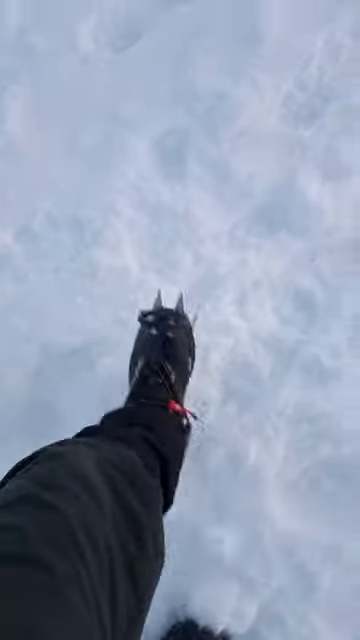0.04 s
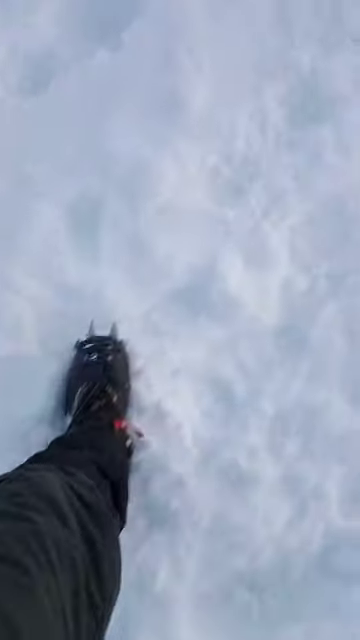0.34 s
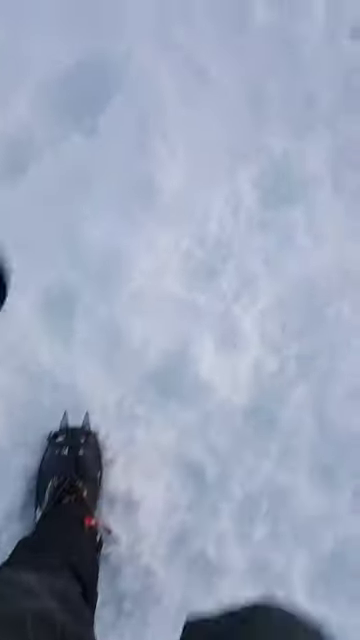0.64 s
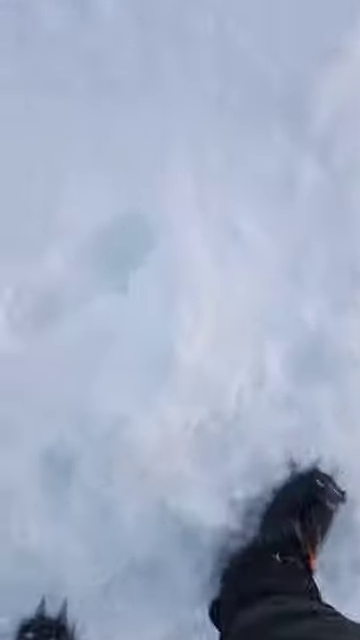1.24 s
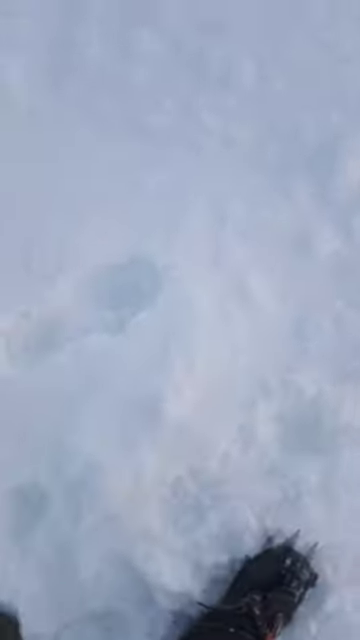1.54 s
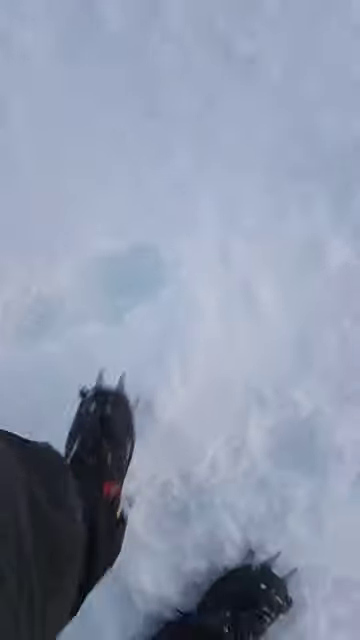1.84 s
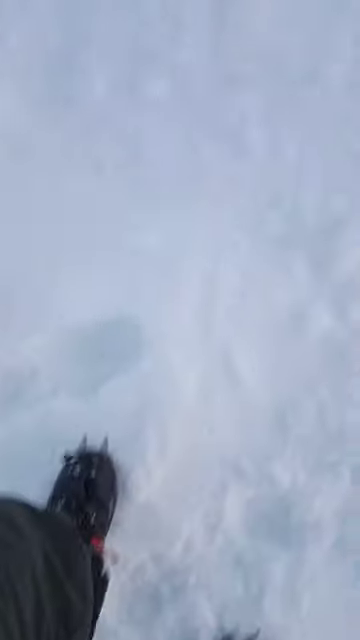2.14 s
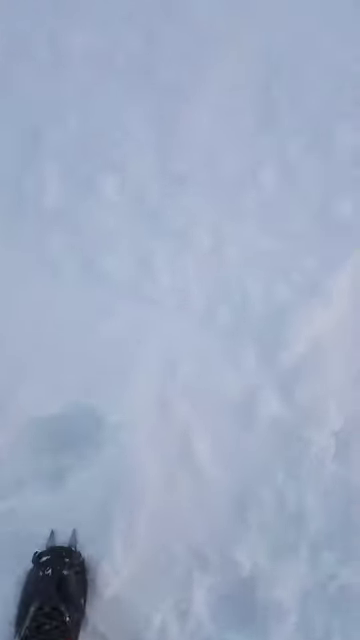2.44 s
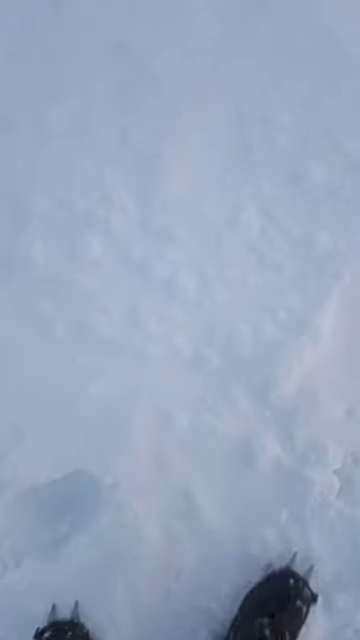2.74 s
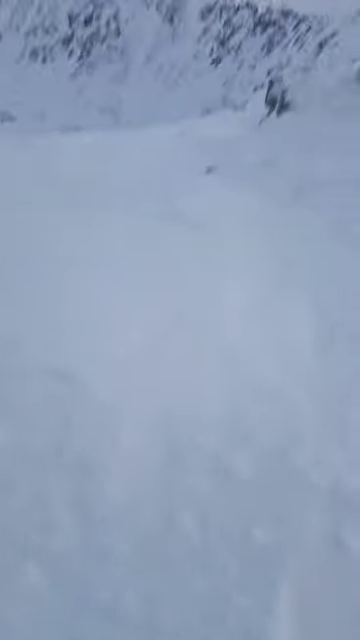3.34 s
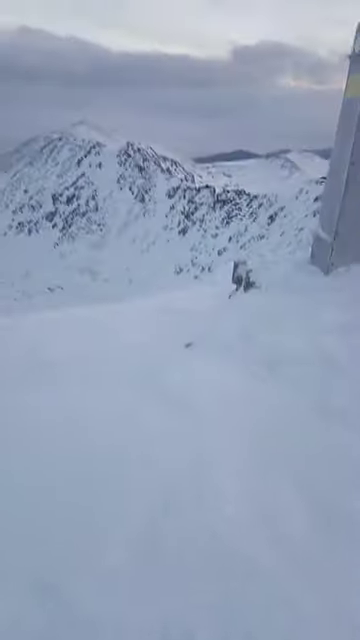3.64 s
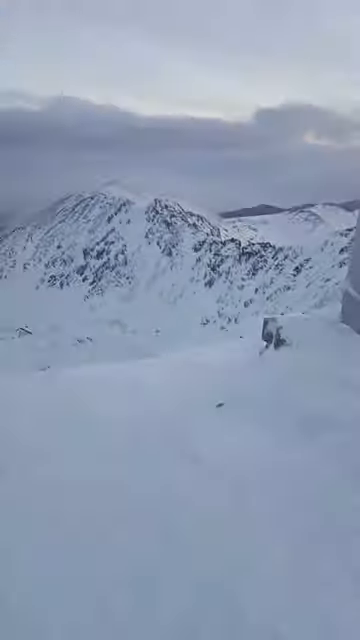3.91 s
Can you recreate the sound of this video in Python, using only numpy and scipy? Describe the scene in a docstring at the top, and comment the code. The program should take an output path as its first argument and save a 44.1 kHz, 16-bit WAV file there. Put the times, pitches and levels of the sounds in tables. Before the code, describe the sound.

Spiked boots crunch over firm, icy snow while low wind rumbles on the microphone.

```python
"""Boots with steel crampons crunch over firm, icy snow, heard from a hand-held phone in the open.
The crust fails by brittle fracture: a rush of tiny impulses, coloured by ice, crust and the hollow-
sounding pack beneath. Impacts excite damped modes of the spikes, the crampon frame and the pack.
Turbulent wind buffets the two microphone ports separately, over a faint hiss;
the right port hears little treble."""
import sys
import numpy as np
from scipy import signal
from scipy.fft import rfft, irfft, next_fast_len
from scipy.io import wavfile

SR = 44100
rng = np.random.default_rng(int(sys.argv[2]) if len(sys.argv) > 2 else 0)


def generate_wav(sig):
    """Save sig (samples, or channels by samples) to the path in sys.argv[1] as 16-bit PCM at SR."""
    pcm = np.round(np.clip(np.atleast_2d(sig).T, -1, 1) * 32767).astype(np.int16)
    wavfile.write(sys.argv[1], SR, pcm)


N = 176400

# response of the right microphone port (f/Hz, gain/dB)
RIGHT_PORT_RESPONSE = [(1000, -0.5), (1800, -6.5), (3000, -4), (4500, -11), (6500, -16), (9500, -36),
                       (12000, -29), (15000, -19)]


def undb(db):
    """Amplitude ratio of a level in decibels."""
    return 10 ** (np.asarray(db) / 20)


def colour(x, points, keep_power=True):
    """Minimum-phase filter through (f/Hz, gain/dB) points; keep_power preserves white-noise power."""
    size = next_fast_len(N + 8192)
    hz, db = np.array(points, float).T
    gain = undb(np.interp(np.log(np.fft.rfftfreq(size, 1 / SR) + 1), np.log(hz), db))
    if keep_power:
        gain = gain / np.sqrt(np.mean(gain ** 2))
    cepstrum = irfft(np.log(gain), size)
    cepstrum[1:size // 2] *= 2  # folding onto positive time makes the filter causal
    cepstrum[size // 2 + 1:] = 0
    return irfft(rfft(x, size) * np.exp(rfft(cepstrum)), size)[..., :N]


def right_port(x):
    """Low-pass response: the right port attenuates the treble."""
    return colour(x, RIGHT_PORT_RESPONSE, keep_power=False)


def wander(hz):
    """Bounded random modulation, interpolated between hz values a second, with a spread near 1."""
    return np.interp(np.arange(N) * hz / SR, np.arange(N), np.sqrt(3) * rng.uniform(-1, 1, N))


def strike(hits, modes, detune=0.032):
    """Free vibration: each blow excites exponentially damped modes, slightly detuned at random."""
    out = np.zeros(N)
    for start, hit_db in hits:
        i = int(start * SR)
        age = np.arange(min(SR // 10, N - i)) / SR
        for (hz, db, t60), chance in zip(modes, rng.standard_normal(len(modes))):
            decay = undb(hit_db + db) * np.exp(-np.log(1000) * age / t60)
            out[i:i + len(age)] += decay * np.sin(2 * np.pi * hz * (1 + detune * chance) * age)
    return out


def air():
    """Broadband flow noise: wind hisses faintly over the open snow."""
    spectrum = [(200, -1), (600, -7.5), (1200, -9), (3000, -11), (6000, -13), (10000, -8.5), (12500, -15),
                (15500, -22.5)]  # hiss (f/Hz, relative level/dB)
    left, right = colour(rng.standard_normal((2, N)), spectrum) * undb(-63 + 0.5 * wander(hz=7.56))
    return np.array([left, right_port(right)])


def wind(t):
    """Turbulent pressure, independent at each port: a lumpy rumble and flurries of smaller eddies."""
    # wind pressure at each port (t/s, level/dB)
    left_gusts = [(0, -25), (.13, -45.5), (.25, -29), (.36, -36), (0.418, -22), (.58, -33), (.72, -36.5),
                  (.92, -19), (1.04, -31), (1.12, -21), (1.2, -30), (1.36, -26.5), (1.5, -39), (1.66, -39),
                  (1.8, -48.5), (1.93, -35.5), (2.1, -43.5), (2.2, -39), (2.42, -44), (2.52, -55.5),
                  (2.662, -33), (2.75, -50), (3.0, -41.5), (3.22, -39.5), (3.32, -55), (3.56, -44),
                  (3.608, -22.5), (3.78, -33), (3.95, -40)]
    right_gusts = [(0, -37.5), (.15, -43.5), (.35, -37.5), (.53, -31), (.75, -39), (1.0, -42),
                   (1.35, -40.5), (1.6, -46.5), (1.75, -42.5), (2.1, -54), (2.35, -50), (2.58, -66.5),
                   (2.9, -39), (3.3, -47), (3.6, -41.5), (3.95, -38)]
    # spectral densities of large and small eddies (f/Hz, relative level/dB)
    rumble_spectrum = [(15, -55), (28, -50.5), (42, -20), (70, 3.5), (110, 4.5), (170, -1.5), (260, -13.5),
                       (400, -23.5), (700, -40), (1500, -68)]
    flurry_spectrum = [(120, -29), (250, 1), (400, -9), (600, -15.5), (1000, -35.5), (2000, -48)]
    ports = []
    for gusts, flurry_db in (left_gusts, -22.5), (right_gusts, -12):
        pressure = undb(np.interp(t, *np.array(gusts).T))
        eddies = wander(hz=54.68)
        rumble = colour(rng.standard_normal(N), rumble_spectrum) * undb(2.5 * eddies)
        flurry = colour(rng.standard_normal(N), flurry_spectrum) * undb(flurry_db + 8 * eddies)
        ports.append(pressure * (rumble + flurry))
    return np.array(ports)


def buffets(t):
    """Convection: an eddy carried across a port makes a brief pressure swing with no net impulse."""
    # single eddies (t/s, f/Hz, level/dB, half length/cycles, port: 0 left, 1 right)
    eddies = [(0.211, 165, -22, 0.52, 0), (0.271, 121, -17.5, 0.49, 0), (0.418, 205, -11.5, 0.71, 0),
              (0.436, 173, -14.5, 0.29, 0), (.502, 115, -14.5, 0.41, 0), (.531, 169, -14.5, 0.3, 0),
              (.651, 155, -22, 0.9, 0), (0.777, 157, -18.5, 0.23, 0), (0.836, 155, -17.5, 0.54, 0),
              (0.888, 116, -11.5, 0.72, 0), (0.898, 150, -17, 0.55, 0), (.948, 180, -19.5, 0.47, 0),
              (.915, 284, -20.5, 0.83, 0), (0.919, 106.8, -17.5, 1, 0), (0.972, 157, -9, 0.28, 0),
              (.977, 310, -15, 0.41, 0), (1.015, 148, -11, 0.52, 0), (1.111, 188, -14, 0.39, 0),
              (1.153, 166, -18.5, 0.39, 0), (1.256, 148, -12, 0.38, 0), (1.269, 240, -17, 0.4, 0),
              (1.651, 133, -23.5, 0.45, 0), (1.94, 111, -23.5, 0.96, 0), (2.054, 180, -28, 0.25, 0),
              (2.661, 156, -25.5, 0.93, 0), (3.601, 221, -6.5, 0.78, 0), (3.627, 158, -10.5, 0.39, 0),
              (3.656, 146, -15, 0.9, 0), (3.763, 141.5, -10.5, 0.43, 0), (3.931, 144, -24.5, 1.5, 0),
              (0.492, 330, -21.5, 0.4, 1), (0.51, 161, -20, 0.34, 1), (.661, 170, -22.5, 0.65, 1),
              (0.715, 201, -28.5, 0.21, 1), (1.264, 206, -24, .6, 1), (1.295, 227, -27.5, 0.42, 1),
              (1.849, 260, -36, 0.16, 1), (2.31, 95, -23, 0.67, 1), (2.767, 295, -28.5, 0.53, 1),
              (3.492, 258, -32.5, 0.4, 1), (2.898, 260, -26, 0.47, 1), (2.904, 108.6, -26, 1, 1),
              (2.974, 225, -22.5, 0.46, 1), (3.14, 261, -31, 0.24, 1), (3.197, 283, -27.5, 0.54, 1),
              (3.406, 417, -32.5, 0.34, 1), (3.452, 246, -29.5, 0.72, 1), (3.761, 332, -27, 0.35, 1),
              (3.775, 300, -28.5, .4, 1), (3.830, 275, -22, 0.47, 1), (3.850, 270, -21.5, 0.38, 1),
              (3.907, 323, -20.5, 0.36, 1), (3.929, 240, -21.5, 0.24, 1)]
    out = np.zeros((2, N))
    for (centre, hz, db, half_length, port), phase in zip(eddies, rng.random(len(eddies))):
        near = abs(t - centre) < 0.05
        cycles = (t[near] - centre) * hz
        swirl = np.sin(2 * np.pi * (cycles + phase)) / np.cosh(np.pi / 2 * cycles / half_length)
        out[int(port), near] += undb(db) * np.gradient(swirl, cycles) / (2 * np.pi)
    return out


def thuds():
    """Impact excitation: the sole drops onto packed snow and drives low, heavily damped modes."""
    landings = [(.123, -35.5), (1.986, -27.5), (1.993, -36), (2.016, -26.5), (2.044, -25.5), (2.052, -27.5),
                (2.106, -43), (2.193, -39), (2.812, -29)]  # blows of the sole (t/s, level/dB)
    pack_modes = [(228, -3, 0.039), (478, -4.5, 0.014), (553, -1, 0.029), (880, -30.5, 0.01)]  # sole on the snow pack (f/Hz, level/dB, T60/s)
    return strike(landings, pack_modes)


def crampons(t, snap_s=0.0017):
    """Fracture and modal ringing: spikes snap the ice and ring, damped by snow; the frame clacks."""
    bites = [(0.0408, -40, -33), (0.1206, -33.5, -28), (0.61, -36.5, -61), (0.741, -44, -45),
             (0.813, -46, -51), (0.823, -42, -39.5), (1.0605, -47, -23.5), (1.10, -36, -42),
             (1.1503, -46, -24), (1.341, -53, -30), (1.433, -37, -31), (1.715, -49, -46), (1.744, -45, -49),
             (1.9858, -52, -19), (1.992, -35, -19), (2.014, -37, -36), (2.024, -42, -22),
             (2.04, -29.5, -35), (2.054, -26.5, -50), (2.1924, -56, -44), (2.274, -37, -40),
             (2.2963, -55, -45), (2.414, -37, -43), (2.454, -30.5, -42), (2.7974, -45, -42),
             (2.8108, -28, -26), (2.861, -32, -29), (2.878, -47, -48), (3.041, -45.5, -59),
             (3.174, -60, -57), (3.193, -50, -50), (3.326, -56, -46), (3.425, -45, -51),
             (3.547, -37.5, -37.5), (3.7742, -39, -48)]  # spikes entering ice (t/s, snap level/dB, ring level/dB)
    clacks = [(.024, -54), (.037, -53), (.103, -45), (.123, -29), (.131, -41.5), (.612, -58), (.826, -51.5),
              (2.799, -33), (2.812, -42.5), (3.548, -49), (3.776, -58.5)]  # frame knocking against the boot (t/s, level/dB)
    snap_spectrum = [(400, -4), (1500, 3.5), (3000, -4.5), (4500, -2), (7000, 5), (10000, 0), (12500, -4),
                     (15500, -18)]  # spectral density of snapping ice (f/Hz, relative level/dB)
    # modes of the steel (f/Hz, level/dB, T60/s)
    spike_modes = [(6120, -20, 0.047), (7500, -29.5, .05), (9300, -8.5, 0.033), (9830, -8, .035)]
    frame_modes = [(1557, -21, 0.021), (1930, -13, 0.035), (2714, -8, 0.03), (2983, -1.5, 0.022),
                   (3310, -12, 0.017), (5080, -8, .03), (6770, -10.5, 0.044)]
    envelope = sum((t >= start) * undb(db) * np.exp(-np.minimum(abs(t - start) / snap_s, 20))
                   for start, db, _ in bites)
    ring = strike([(start, db) for start, _, db in bites], spike_modes)
    snap = colour(envelope * rng.standard_normal(N), snap_spectrum)
    sound = snap + ring + strike(clacks, frame_modes)
    return np.array([sound, right_port(sound)])


def chips(force, per_s=500, centre_hz=8466, spread_octaves=0.275, spread_db=4.5, t60=0.012):
    """Natural frequencies: each ice splinter rings at its own, scaled by the force that frees it."""
    age = np.arange(SR // 20) / SR
    out = np.zeros(N + len(age))
    decay = np.exp(-np.log(1000) * age / t60)
    decay *= np.sqrt(2 * SR / per_s / np.sum(decay ** 2))  # rms near 1 for unit force
    starts = np.flatnonzero(rng.random(N) < per_s / SR)
    size, pitch = np.clip(rng.standard_normal((2, N)), -2, 2)
    for i in starts:
        hz = centre_hz * 2 ** (spread_octaves * pitch[i])
        amplitude = force[i] * undb(spread_db * size[i])
        out[i:i + len(age)] += amplitude * decay * np.sin(2 * np.pi * hz * age)
    return out[:N]


def fractures(spread_db, per_s=9000):
    """Shot noise: tiny fractures form a random train of impulses of uneven size, rms 1."""
    impulses = (rng.random(N) < per_s / SR) * rng.choice([-1, 1], N)
    impulses = impulses * undb(spread_db * np.clip(rng.standard_normal(N), -2.5, 2.5))
    return impulses / impulses.std()


def crush_envelopes(t, release_s=0.0093):
    """Incoherent addition: overlapping crushes sum in power, giving ice, crust and pack amplitudes."""
    # snow giving way under a boot (t/s, rise/s, length/s, ice level/dB, change over the length/dB,
    # crust level/dB re ice, pack level/dB re ice)
    crushes = [(0, 0.0021, 0.017, -50.5, -3, -9.5, -15), (0.088, .003, 0.017, -50, 5.5, -7.5, -8),
               (0.121, 0.008, 0.0072, -31.5, -3, -8.5, -13.5), (0.136, 0.017, 0.2, -56.5, 4.5, -9, -5),
               (0.321, .05, 0.073, -37, -3, -11.5, 0), (0.394, 0.011, 0.11, -44.5, -7.5, -9, -1),
               (0.505, 0.051, 0.12, -47.5, -5.5, -7, 0.5), (0.645, 0.014, 0.038, -46, -5, -9, 3),
               (0.753, 0.0088, 0.1, -49.5, -12.5, -13.5, -6), (0.873, 0.0054, 0.015, -44.5, -11.5, -12, -8),
               (0.929, 0.0061, 0.013, -56, 1.5, -11, -15), (1.053, 0.0096, 0.058, -35.5, -3, -15, -11.5),
               (1.114, 0.0077, 0.043, -37, -6.5, -7.5, -0.5), (1.157, .01, 0.142, -51, -1, -6.5, 1.5),
               (1.299, 0.045, 0.17, -43.5, -6, -7.5, 0.5), (1.466, 0.0038, .18, -45, -8, -11.5, -10),
               (1.694, 0.024, .022, -47.5, 7.5, -14, -6), (1.737, .003, 0.01, -38, -10.5, -9.5, -1.5),
               (1.752, 0.0076, .13, -67.5, 4.5, -1.5, 8), (1.983, 0.0022, 0.0076, -25.5, -6.5, -10, -5),
               (2.002, 0.009, .049, -33.5, -0.5, -7.5, -3), (2.087, .005, 0.18, -55.5, 2, -5, 3.5),
               (2.169, 0.03, 0.22, -33, -9.5, -10.5, -5), (2.402, 0.014, 0.026, -40, 3.5, -10.5, -7.5),
               (2.438, 0.013, 0.037, -33.5, -9, -11.5, -7.5), (2.491, 0.041, 0.095, -45, -11.5, -14.5, -8),
               (2.607, 0.022, 0.091, -57, 1, -7.5, 1), (2.765, 0.0012, 0.03, -44, -9, -8.5, -3),
               (2.794, 0.0025, .044, -34.5, -2.5, -11, -3.5), (2.834, .003, 0.066, -41.5, -13, -7.5, -7),
               (2.878, 0.046, 0.088, -44.5, -8, -8.5, -2), (2.996, 0.025, 0.16, -69, -13, 5, 16),
               (3.128, 0.028, 0.068, -62.5, -2.5, -5, 1), (3.3, 0.047, 0.3, -65.5, 4, -1, 5),
               (3.603, 0.064, 0.39, -53, -18.5, -7.5, -12), (3.815, 0.011, 0.21, -78.5, 27.5, 3, 13)]
    power = np.zeros((3, N))
    for start, rise, length, db, change_db, crust_db, pack_db in crushes:
        age = np.maximum(t - start, 0)
        attack = np.minimum(age / rise, 1)
        level = undb(db + change_db * np.minimum(age / length, 1))
        release = np.exp(-np.maximum(age - length, 0) / release_s)
        power += (undb([0, crust_db, pack_db])[:, None] * attack * level * release) ** 2
    flutter = undb(1.04 * wander(hz=95.6))
    return np.sqrt(power) * flutter


def crunch(t, correlation=0.1):
    """Brittle fracture: impulses sound in ice, crust and snow pack, and the ice throws off chips."""
    # fracture spectra of fine ice, breaking crust and the pack beneath (f/Hz, relative level/dB)
    ice_spectrum = [(2500, -30.5), (4500, -13.5), (6000, -9.5), (8000, -7.5), (9500, -1.5), (10800, -2),
                    (12200, -11), (15500, -13.5)]
    crust_spectrum = [(700, -5), (1150, -1), (1500, 4), (1850, 3.5), (2200, -0.5), (2900, 1), (3600, -1),
                      (4600, 0), (7000, -41)]
    pack_spectrum = [(60, 2), (160, 4.5), (350, -1), (480, 0), (600, -1.5), (720, -5), (950, -8.5),
                     (1300, -19), (2500, -33)]
    ice, crust, pack = crush_envelopes(t)
    ice = ice * undb(1.5 * wander(hz=450))  # ice fractures come in quick clusters
    left, independent = (colour(undb(-3) * ice * fractures(spread_db=2.5), ice_spectrum)
                         + colour(crust * fractures(spread_db=7.5), crust_spectrum) for _ in range(2))
    right = correlation * left + np.sqrt(1 - correlation ** 2) * independent
    chip_force = undb(-12.5) * ice + undb(-83)  # the constant term stands for loose chips
    tinkle = colour(chips(chip_force), ice_spectrum)
    hollow = colour(pack * fractures(spread_db=7.5), pack_spectrum)
    return np.array([left + tinkle, right_port(right + tinkle)]) + hollow


def scene():
    """Superposition in a free field: wind and footsteps add with no echo."""
    t = np.arange(N) / SR
    return wind(t) + crunch(t) + crampons(t) + thuds() + buffets(t) + air()


def record(dry, low_hz=21, top_hz=15500, stop_s=3.954):
    """Band limiting: the phone cuts the deepest rumble and the top, and stops just before the end."""
    high_pass = signal.butter(3, low_hz, "highpass", fs=SR, output="sos")
    low_pass = signal.ellip(10, 0.2, 70, top_hz, fs=SR, output="sos")
    fade_out = np.clip((stop_s - np.arange(N) / SR) / 0.002, 0, 1)
    return signal.sosfilt(low_pass, signal.sosfilt(high_pass, dry) * fade_out)


dry = scene()
out = record(dry)
generate_wav(out)
```